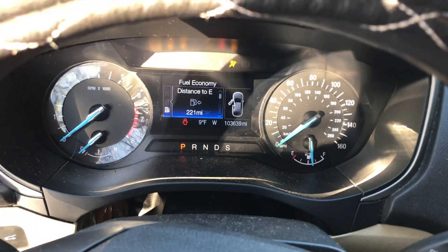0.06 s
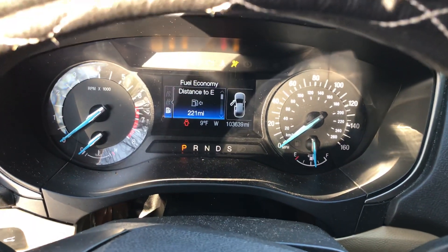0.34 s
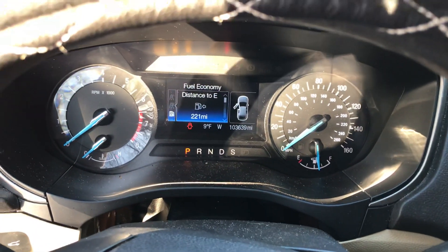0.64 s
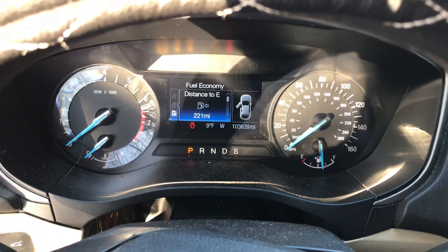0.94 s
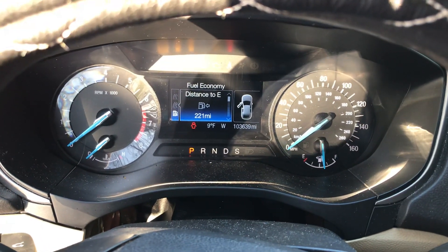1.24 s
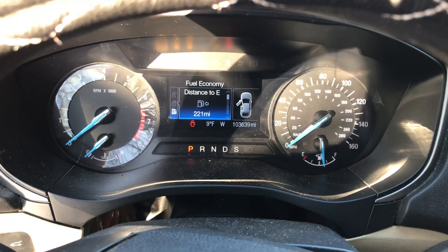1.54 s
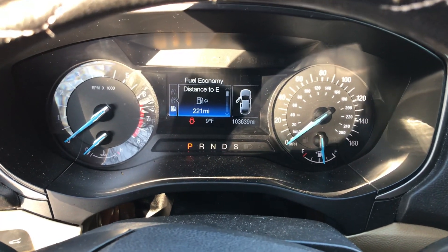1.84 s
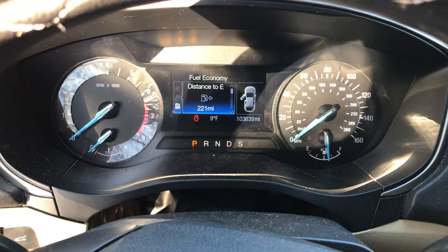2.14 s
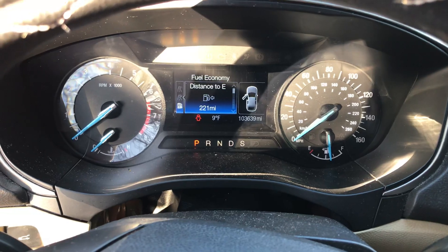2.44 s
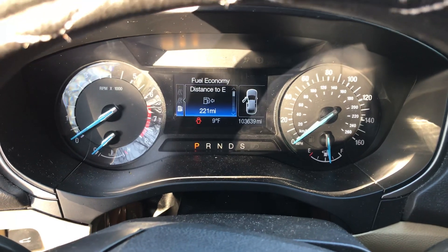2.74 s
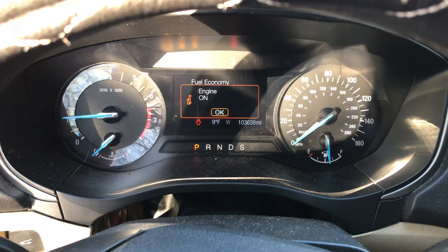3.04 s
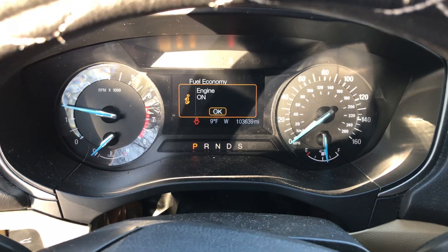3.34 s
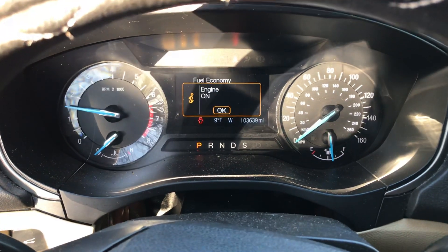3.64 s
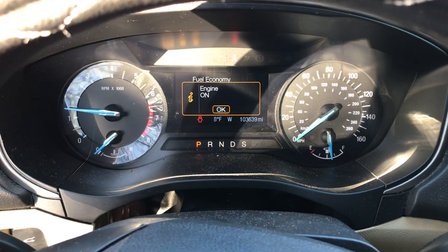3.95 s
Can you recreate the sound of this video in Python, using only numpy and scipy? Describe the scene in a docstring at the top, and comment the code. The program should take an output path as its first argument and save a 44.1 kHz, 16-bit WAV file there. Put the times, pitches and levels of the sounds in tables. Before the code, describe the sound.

A car engine starts, heard from the driver's seat. Faint ignition clicks and key clinks open, with sharper clicks and dull knocks around 1.6 seconds. From 1.7 seconds the starter cranks, grinding with a whine that swoops up and down. At 2.8 seconds the engine catches loudly, flares and eases into a deep rumble with light clatter until 4 seconds, while the key clicks and the bunch jingles again.

```python
"""A key clicks round in the ignition and its bunch clinks: a cold start, heard from the driver's seat.
The starter labours with a swooping whine, slowing against each compression and speeding up after it.
The engine catches, flares and settles into a deep rumble, its firing harmonics booming in the cabin.
Grinding and clatter from the engine bay are coloured by the resonant panels of the bulkhead."""
import sys
import numpy as np
from scipy import signal
from scipy.fft import rfft, irfft
from scipy.io import wavfile
from scipy.ndimage import uniform_filter1d

SR = 44100
rng = np.random.default_rng(int(sys.argv[2]) if len(sys.argv) > 2 else 0)


def to_wav(s):
    """Save 16-bit WAV."""
    ch = np.atleast_2d(s).T  # columns
    pcm = np.round(np.clip(ch, -1, 1) * 32767)  # PCM
    wavfile.write(sys.argv[1], SR, pcm.astype(np.int16))


N = 176400
T = np.arange(N) / SR
HIT_T = T[:SR // 5]


def amp(db):
    """Decibels to amplitude ratio."""
    return 10 ** (np.asarray(db) / 20)


def unit(x):
    """Normalisation to rms 1."""
    return x / np.sqrt(np.mean(x ** 2) + 1e-20)


def noise(n=N):
    """Gaussian white noise."""
    return rng.standard_normal(n)


def curve(rows, column=1):
    """Linear interpolation of a time table at every sample."""
    rows = np.array(rows)
    return np.interp(T, rows[:, 0], rows[:, column])


def add(mix, start_s, sound):
    """Superposition of a delayed sound."""
    part = mix[round(start_s * SR):][:len(sound)]
    part += sound[:len(part)]


def colour(x, points, tilt_db=0):
    """Spectral shaping with a tilt per octave, rms 1."""
    hz, db = np.transpose(points)
    octave = np.log2(np.fft.rfftfreq(len(x), 1 / SR) + 1)
    gain = amp(np.interp(octave, np.log2(hz + 1), db) + tilt_db * octave)
    return unit(irfft(rfft(x) * gain, len(x)))


def peak(hz, skirt_db):
    """A spectral peak, skirt_db weaker an octave to either side."""
    return [(hz * 2 ** octave, -skirt_db * np.sqrt(abs(octave))) for octave in np.arange(-10, 2, 0.1)]


def wander(hz):
    """Random modulation: low-passed noise, rms 1."""
    return unit(irfft(rfft(noise()) / (1 + (np.fft.rfftfreq(N, 1 / SR) / hz) ** 4), N))


def gate(on, off, rise, fall):
    """Linear attack, hold and exponential release, in seconds."""
    return np.clip((T - on) / rise, 0, 1) * np.exp(-np.maximum(T - off, 0) / fall)


def resonate(x, hz, width_hz):
    """A double-pole resonance whose centre can glide, rms 1."""
    carrier = np.exp(2j * np.pi * np.cumsum(hz * np.ones(N)) / SR)
    pole = np.exp(-np.pi * width_hz / SR)
    return unit((carrier * signal.lfilter([1], [1, -2 * pole, pole ** 2], x / carrier)).real)


def highpass(x, hz):
    """Sixth-order bass cut."""
    return signal.sosfilt(signal.butter(6, hz, "high", fs=SR, output="sos"), x)


def decay(t60):
    """Free decay of a hit: 60 dB in t60 seconds."""
    return amp(-60 * HIT_T / t60)


def ring(modes):
    """Modal vibration: damped sinusoids of random phase."""
    return sum(amp(db) * decay(t60) * np.sin(2 * np.pi * (hz * HIT_T + rng.random()))
               for hz, db, t60 in modes)


def cabin_echo(x, t60, wet_db):
    """Reverberation: dense reflections decay exponentially."""
    t = T[:SR // 4]
    tail = noise(len(t)) * amp(-60 * t / t60) * (t > 0.003)
    return x + amp(wet_db) * signal.fftconvolve(x, tail / np.linalg.norm(tail))[:N]


# murmur spectrum: frequency_hz, level_db
MURMUR_SPECTRUM = [(20, -26.5), (74, -3), (142, -21), (193, -19), (459, -32), (660, -27.5), (1330, -33),
                   (1650, -38.5), (12000, -52)]

def murmur():
    """Ambient noise: the parked car's surroundings, strongest in the bass."""
    return amp(-53.5) * colour(noise(), MURMUR_SPECTRUM)


# detent clicks: start_s, level_db, pitch_hz, housing_db
LOCK_CLICKS = [(0.109,-40,5840,-18),(.142,-43.5,2770,-0.5),(.876,-52,2400,0),(.945,-42.5,2400,-11),(1.140,-42,2280,-16),(1.613,-29.5,4480,-3),(1.631,-32.5,2010,-0.5),(1.738,-36.5,6620,-12),(3.102,-38,7900,-17),(3.128,-25.5,6500,-7.5),(3.147,-36.5,9600,2.5)]
# click spectrum: frequency_hz, level_db
LOCK_SPECTRUM = [(200,1),(2700,2.5),(6200,-7),(16000,-5)]
# lock housing mode: pitch_hz, level_db, t60_s
HOUSING_MODES = [(637,2.5,0.057)]
CLICK_RISE_S = 0.0017

def lock():
    """Impact excitation: each detent gives a noise burst and rings the housing."""
    out, attack = np.zeros(N), np.minimum(HIT_T / CLICK_RISE_S, 1)
    for start, db, hz, housing_db in LOCK_CLICKS:
        broad = colour(noise(len(HIT_T)), LOCK_SPECTRUM)
        pitched = amp(2) * colour(noise(len(HIT_T)), peak(hz, skirt_db=25.5))
        click = (broad + pitched) * decay(t60=0.032)
        add(out, start, amp(db) * attack * (click + amp(housing_db) * ring(HOUSING_MODES)))
    return out


# keys striking on their ring: start_s, level_db, pitch_hz
KEY_CLINKS = [(.234,-46,10300),(0.585,-48.5,7100),(1.049,-36.5,15000),(1.639,-24,15300),(1.698,-36,13300),(1.768,-38.5,7650),(1.833,-23.5,13000),(3.198,-29.5,15200),(3.489,-26,15600),(3.512,-32,13000),(3.745,-29.5,11830)]

def clinking_keys(t60=0.026, skirt_db=16.5):
    """Inharmonic modes: a struck key sounds three partials under a bright burst."""
    out, attack = np.zeros(N), np.minimum(HIT_T / CLICK_RISE_S, 1)
    for start, db, hz in KEY_CLINKS:
        pitches = [hz, *hz * rng.uniform(0.5, 1, size=2)]
        modes = [(f, -11 + skirt_db * np.log2(f / hz), t60) for f in pitches]
        burst = colour(noise(len(HIT_T)), peak(hz, skirt_db)) * decay(t60)
        add(out, start, amp(db) * attack * (burst + ring(modes)))
    return out


# dull knocks: start_s, level_db, rise_s, tilt_db_per_octave, pitch_hz
DULL_KNOCKS = [(0.537,-47.5,0.0029,-3.5,310),(1.588,-41.5,0.014,7,688),(1.632,-31,0.013,-4,334),(1.667,-37,0.0027,0.5,659),(1.803,-31.5,0.009,0.5,726),(3.559,-40.5,0.0049,2.5,958),(3.641,-41,0.0024,-1.5,663),(3.666,-35,.006,0.5,732)]
# knock spectrum: frequency_hz, level_db
KNOCK_SPECTRUM = [(150,-7.5),(650,-3.5),(1350,-5.5),(2400,-13),(12000,-38.5)]

def knocks(t60=0.093):
    """Damped impacts: starter drive and cabin trim thud with noise and one tone."""
    out = np.zeros(N)
    for start, db, rise, tilt, hz in DULL_KNOCKS:
        burst = colour(noise(len(HIT_T)), KNOCK_SPECTRUM, tilt)
        tone = amp(1) * np.sin(2 * np.pi * hz * HIT_T)
        envelope = np.minimum(HIT_T / rise, amp(-60 * (HIT_T - rise) / t60))
        add(out, start, amp(db) * unit(burst + tone) * envelope)
    return out


# keys rubbing: time_s, level_db
SLIDE_LEVEL = [(2.72,-69.5),(2.76,-50.5),(2.98,-66),(3.36,-62.5),(3.54,-56),(3.68,-73)]

def sliding_keys():
    """Friction noise: keys slide over one another with a flickering hiss."""
    hiss = colour(noise() * amp(5.55 * wander(hz=103)), peak(hz=6000, skirt_db=11))
    return hiss * amp(curve(SLIDE_LEVEL)) * (T > SLIDE_LEVEL[0][0])


# bulkhead resonances: pitch_hz, width_hz, level_db
PANEL_MODES = [(275.7,48,-18.5),(663,140,-6),(1410,60,-15.5),(2243,45,-22)]

def bulkhead(x, spectrum):
    """Panel transmission: engine bay sound takes a broad colour plus resonances."""
    return colour(x, spectrum) + sum(amp(db) * resonate(x, hz, width) for hz, width, db in PANEL_MODES)


# starter speed, as its gear whine: time_s, pitch_hz
WHINE_PITCH = [(1.78,2005),(1.885,3950),(1.94,4150),(2.0,3674),(2.1,2142),(2.16,3815),(2.21,4522),(2.305,2349),(2.41,4670),(2.51,2347),(2.61,4705),(2.71,2350),(2.805,4457),(2.92,4280),(3.1,3000)]
# compressions loading the starter: start_s, length_s, level_db
COMPRESSIONS = [(1.719,0.13,-44.5),(1.916,0.2,-46.5),(2.202,0.099,-43.5),(2.406,0.12,-45),(2.612,0.11,-44),(2.745,0.17,-45.5)]
# engine rocking on its mounts: time_s, level_db
SHAKE_LEVEL = [(1.8,-46),(2.25,-46)]
# spectra of tooth hum, grinding, starter housing and rocking: frequency_hz, level_db
MESH_SPECTRUM = [(400,-4),(3000,-19)]
GRIND_SPECTRUM = [(88, -46), (150, -10.5), (270, -1), (514, -7.5), (790, -10.5), (2500, -20.5),
                  (4860, -26.5), (16000, -62)]
WHINE_SPECTRUM = [(2000,-29.5),(3700,-3.5),(4300,0.5),(4650,-8)]
SHAKE_SPECTRUM = [(18,-34),(40,4.5),(115,-1.5),(400,-47)]

def starter(on_s=1.732, off_s=2.735, coast_end_s=2.925, rise_s=0.011, sag_db_per_s=-15):
    """Gear noise under cyclic load: it grinds at each compression and whines in between."""
    pitch = uniform_filter1d(curve(WHINE_PITCH), size=SR // 30)
    load = np.zeros(N)
    for start, length, db in COMPRESSIONS:
        sag_db = sag_db_per_s * np.clip(T - start, 0, length)
        load += amp(db + sag_db) * gate(start, start + length, rise_s, fall=0.022)
    strain = load / load.max()
    cranking = gate(on_s, off_s, rise_s, fall=rise_s)
    spinning = gate(on_s, coast_end_s, rise_s, fall=0.12)

    pulses = np.diff(np.floor(np.cumsum(pitch / 15) / SR), prepend=0)  # one per turn of 15 teeth
    drive = highpass(0.2 * colour(pulses - pulses.mean(), MESH_SPECTRUM) + noise(), hz=105)
    grind = bulkhead(drive, GRIND_SPECTRUM) * load
    free_spin = amp(-57) * colour(drive, GRIND_SPECTRUM, tilt_db=2.5)  # brighter without load
    trembling = resonate(noise(), pitch * (1 + 0.041 * wander(hz=400)), width_hz=200)
    whine = colour(trembling, WHINE_SPECTRUM) * amp(-58 - 6 * strain)
    subharmonic = amp(-57.5) * resonate(noise(), pitch / 2, width_hz=100) * strain
    whistle = amp(-68) * resonate(noise(), hz=8140, width_hz=45)
    shake = colour(noise(), SHAKE_SPECTRUM) * amp(curve(SHAKE_LEVEL))
    return grind + (free_spin + whistle) * cranking + (whine + subharmonic + shake) * spinning


# firings per second: time_s, rate_hz
FIRING_RATE = [(2.88,52.03),(2.96,44.93),(3.12,51.6),(3.27,55.22),(3.41,53.91),(3.5,50.63),(3.68,49.45),(4,45.27)]
# lowest three harmonics in the cabin: time_s, first_db, second_db, third_db
BOOM_LEVELS = [(2.785,-54,-45,-57),(2.803,-21,-43,-45),(2.855,-16,-15,-32),(2.895,-31,-29.5,-29),(2.99,-21.5,-34.5,-45),(3.07,-19.5,-17.5,-26),(3.185,-15.5,-24.5,-20),(3.28,-22.5,-23.5,-23),(3.44,-24.5,-24,-22),(3.53,-20.5,-31.5,-32.5),(3.76,-21.5,-35.5,-41),(4,-31,-32,-36)]
# higher harmonics: harmonic_number, level_db
GROWL_LEVELS = [(4,-43),(5,-45.5),(6,-54),(10,-58),(15,-59)]
# combustion strength: time_s, gain_db
COMBUSTION = [(2.85,1),(2.98,-2),(3.13,0.5),(3.7,-8)]
# rumble of unequal firings: time_s, level_db
RUMBLE_LEVEL = [(2.88,-29.5),(3.2,-38),(4,-33)]
# spectra of rumble and clatter: frequency_hz, level_db
RUMBLE_SPECTRUM = [(15,-33),(35,-2.5),(210,-4),(800,-65.5)]
CLATTER_SPECTRUM = [(180, -20), (300, -2), (700, -6), (1100, -11.5), (1520, -11), (2360, -19.5),
                    (4090, -23), (16000, -60)]

def engine(catch_s=2.8066, throb_depth=0.23):
    """Periodic excitation: firings form a harmonic series and modulate rumble and clatter."""
    firings = np.cumsum(curve(FIRING_RATE)) / SR
    firings -= np.interp(catch_s, T, firings)
    phase = 2 * np.pi * firings
    effort = amp(curve(COMBUSTION))
    running = gate(catch_s - 0.022, T[-1], rise=0.013, fall=1)

    boom = sum(-amp(curve(BOOM_LEVELS, column=k)) * np.cos(k * phase) for k in range(1, 4))
    growl = np.zeros(N)
    for k in range(4, 16):
        level_db = np.interp(k, *np.transpose(GROWL_LEVELS)) + 3.3 * wander(hz=12)
        growl += amp(level_db) * np.cos(k * phase + 0.5 * wander(hz=11.7))
    harmonics = np.sqrt(2) * (boom + growl * effort)  # rms to peak

    throb = unit(1 + throb_depth * np.sin(phase))
    pulses = np.diff(np.floor(firings), prepend=np.floor(firings[0]))
    beats = unit(cabin_echo(pulses * amp(2 * wander(hz=42)), t60=0.091, wet_db=20))
    rumble = colour(throb * noise(), RUMBLE_SPECTRUM) * amp(curve(RUMBLE_LEVEL))
    rattle = bulkhead(0.35 * beats + throb * noise(), CLATTER_SPECTRUM)
    clatter = amp(-44.5) * effort * unit(highpass(rattle, hz=247))
    return running * (harmonics + rumble + clatter)


def scene():
    """Superposition of all sources at the driver's seat, in mono."""
    background = murmur()
    impacts = cabin_echo(lock() + clinking_keys() + knocks(), t60=0.07, wet_db=-12)
    return (background + impacts + sliding_keys() + starter() + engine())[None]


def record(dry):
    """Band limiting: a linear-phase low-pass at 15.9 kHz."""
    lowpass = signal.firwin(511, 15900, window=("kaiser", 9), fs=SR)
    return signal.oaconvolve(dry, lowpass[None], "same")


dry = scene()
out = record(dry)
to_wav(out)
```